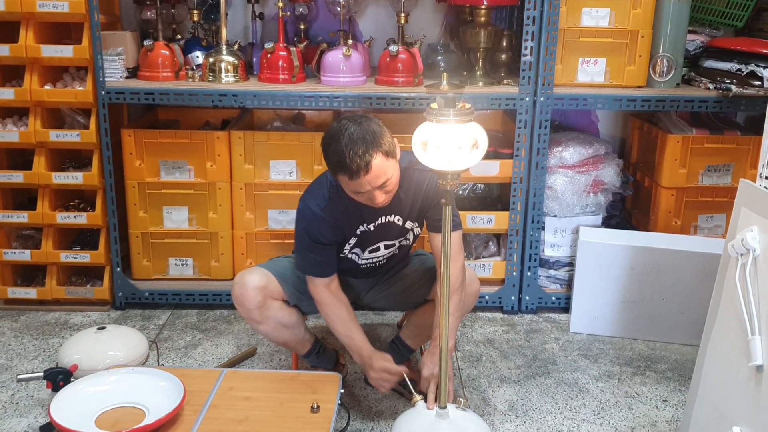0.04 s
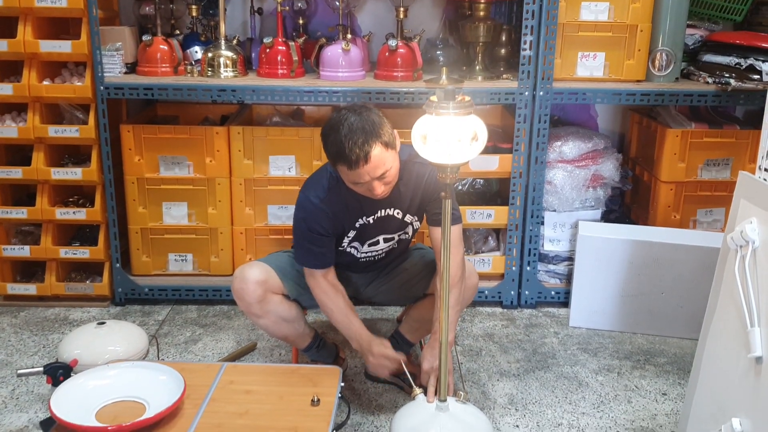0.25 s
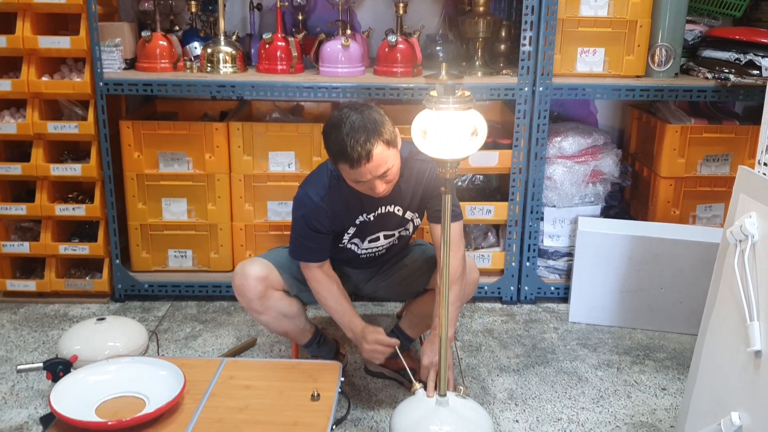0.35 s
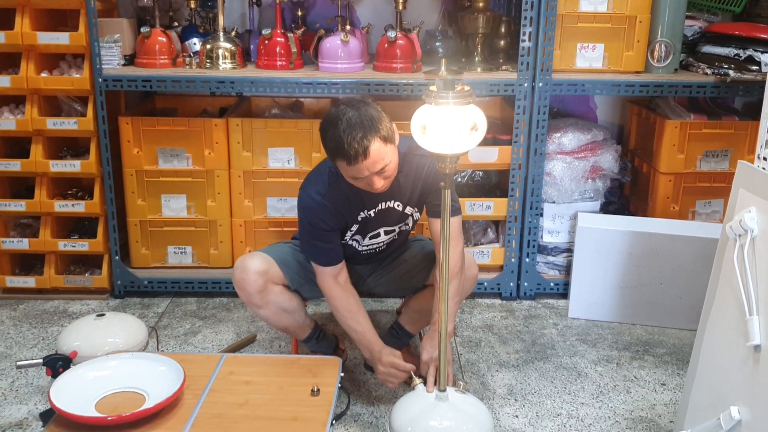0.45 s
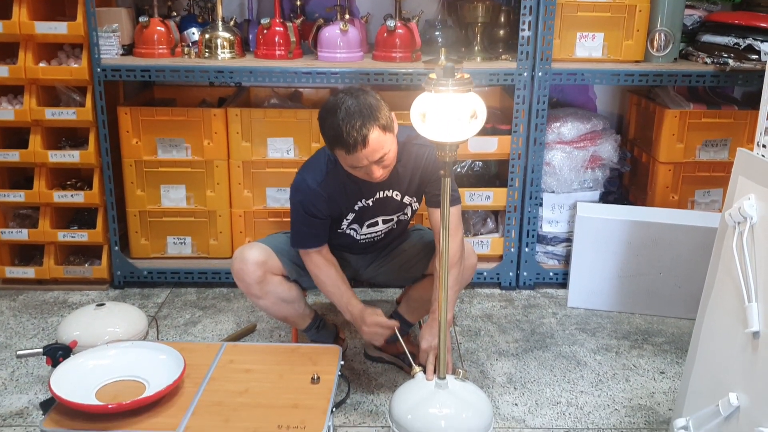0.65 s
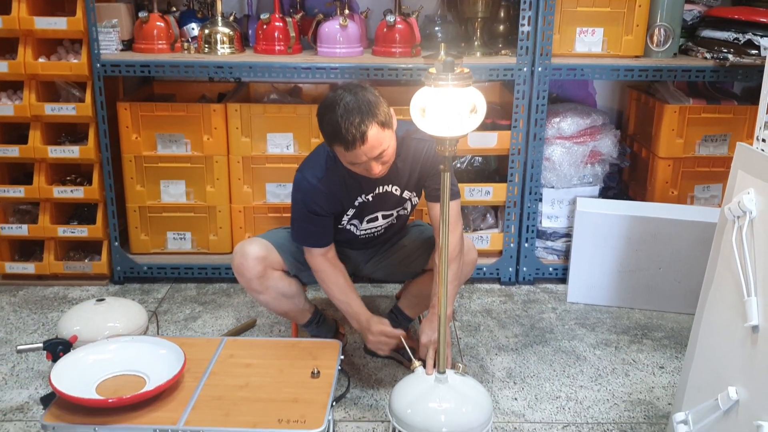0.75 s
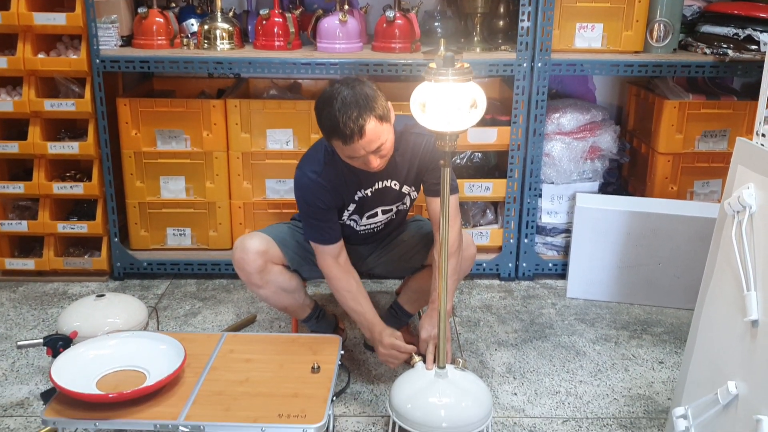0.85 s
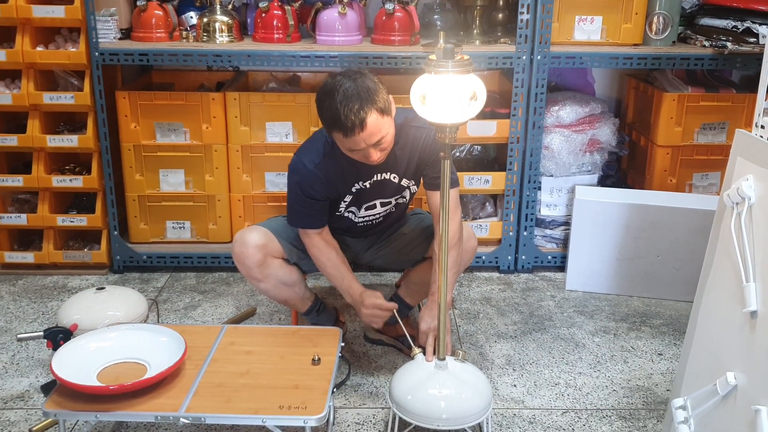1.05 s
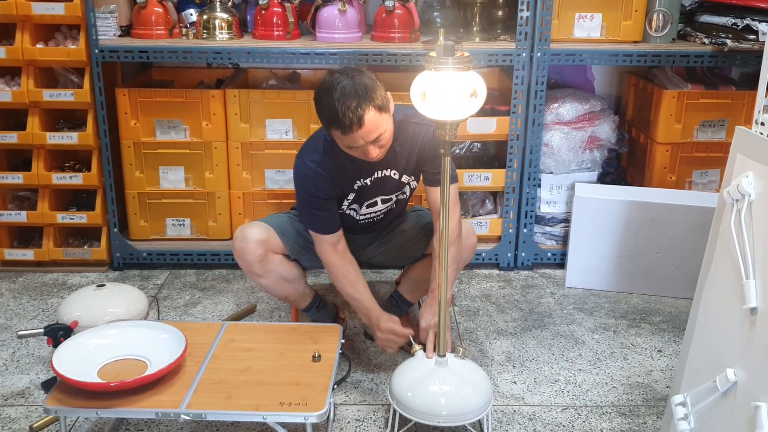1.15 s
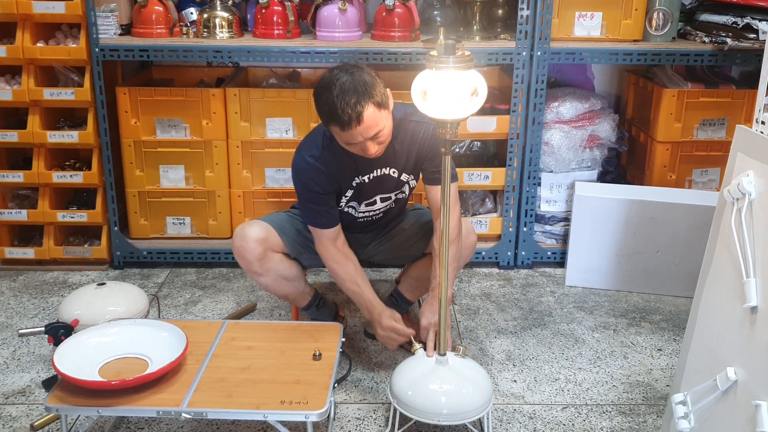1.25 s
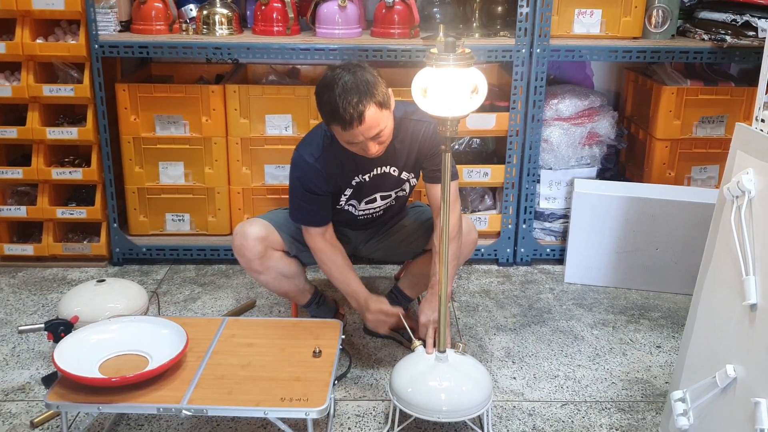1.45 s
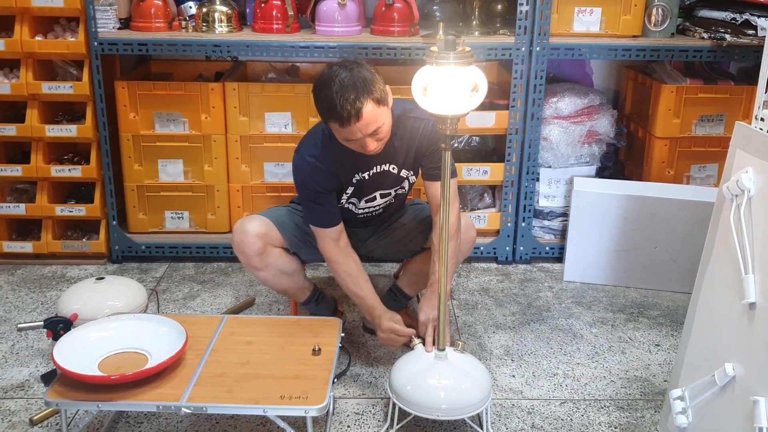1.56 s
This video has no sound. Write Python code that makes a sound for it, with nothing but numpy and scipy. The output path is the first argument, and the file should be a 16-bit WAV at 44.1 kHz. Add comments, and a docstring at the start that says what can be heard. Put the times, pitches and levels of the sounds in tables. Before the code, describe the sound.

Someone pumps up a lantern by hand in a workshop, almost three strokes a second. Hollow hoots and metallic puffs of air alternate with faint scraping pulls, while the flame hisses softly and the room rumbles low.

```python
"""Pumping up a lantern

A small hand pump on a lantern's metal tank is worked in a workshop, almost three strokes a second.
The rod swishes in and out. On each push the trapped air hoots down in pitch, then spits through
the valve and rings the metal. On each pull the seal scrapes faintly.
The flame's steady hiss and the room's low rumble lie under it all."""
import sys
import numpy as np
from scipy import signal
from scipy.fft import rfft, irfft, next_fast_len
from scipy.io import wavfile
from scipy.ndimage import uniform_filter1d, map_coordinates

SR = 44100
rng = np.random.default_rng(int(sys.argv[2]) if len(sys.argv) > 2 else 0)


def transcribe(signal):
    """Save signal, clipped to [-1, 1], as a 16-bit WAV file at the path in sys.argv[1]."""
    frames = np.atleast_2d(signal).T
    limited = np.clip(frames, -1, 1)
    pcm = np.round(limited * 32767).astype(np.int16)
    wavfile.write(sys.argv[1], SR, pcm)


N = 70560

# Pushes: (start [s], time to full pressure [s], hold [s], hoot level [dB], hoot swell [dB],
# valve delay [s], spit level [dB], spit brightness [dB per octave], first pitch drop time [s])
PUMP_PUSHES = [(0.173, 0.051, 0.002, -23.5, 23, 0.008, -29.5, -1.5, .025),
               (0.526, 0.046, 0.015, -27, 19, 0.002, -34, -1.74, .02),
               (0.889, 0.03, 0.012, -32.5, 5, 0.003, -47, -1.5, .014),
               (1.239, 0.055, 0.0017, -25.5, 17, 0.007, -29.5, -1.2, .022),
               (1.591, 0.044, .004, -23.5, 22, .004, -71.5, 0, .024)]
# Notes of the air chamber: (pitch [Hz], width [Hz], level [dB])
CHAMBER_NOTES = [(517, 21, -6), (568, 24, -6), (756, 21, -8)]
# Tone colour of spits, slips and ticks: (frequency [Hz], level [dB])
SPIT_COLOUR = [(150, -17), (400, 4), (750, 9), (1000, -2), (1400, 6), (2200, 6), (2900, 0.5), (4800, 5.5),
               (7000, -4.5), (10000, -0.5), (15500, -3.5)]


def hoots():
    """Trapped air sings lower and louder as the pressure builds, fluttering and ringing the chamber."""
    # Echoes off near walls: (delay [s], level [dB], lean to the left [dB])
    walls = [(.0195, -8, -8), (.0335, -14, 9)]
    start_hz, bend_hz, low_hz, end_hz = 775.5, 581.5, 500, 532
    flutter_hz, flutter_depth = 63.5, 0.64
    attack_s, fall_db_per_s = 0.0053, 400
    hoot = np.zeros(N)
    for start, rise, hold, db, swell_db, *_, glide in PUMP_PUSHES:
        t = np.maximum(clock() - start, 0)
        lowest_at = rise + hold / 2
        hz = np.interp(t, [0, glide, lowest_at, lowest_at + 0.03], [start_hz, bend_hz, low_hz, end_hz])
        rise_left = np.maximum(1 - t / rise, 0)
        level_db = db - swell_db * rise_left ** .8 - fall_db_per_s * np.maximum(t - rise - hold, 0)
        fade_in = np.minimum(t / attack_s, 1)
        flutter = 1 + flutter_depth * np.cos(2 * np.pi * flutter_hz * (t - rise))
        jitter = 0.02574 + .12 * np.exp(-t / .02)  # the pitch is shakiest at first
        note = tone(hz * (1 + jitter * wobble(500)))
        roughness = 1 + 0.24 * wobble(200)
        hoot += amp(level_db) * fade_in * flutter * note * roughness
    muffled = filtered(hoot, lambda f: 1 / (1 + 1j * f / 800))
    voice = amp(-5.5) * muffled + filtered(hoot, body(CHAMBER_NOTES))
    echoes = sum(amp(db) * pan(np.interp(clock() - delay, clock(), voice), lean)
                 for delay, db, lean in walls)
    return room(pan(voice, left_db=1.5) + echoes, wet_db=-13)


def valve():
    """At full pressure air spits through the valve, ringing the metal, the chamber and the tank."""
    # Notes of the hollow tank: (pitch [Hz], width [Hz], level [dB])
    tank_notes = [(166, 20, -4), (223, 14, -13), (256, 18, 19), (352, 14, -2)]
    # Notes of the metal: (pitch [Hz], time to fade 60 dB [s], level [dB])
    metal_notes = [(1355, .17, -6), (1414, .13, -11), (1645, .18, -5), (1981, .18, -9), (2060, .12, -10),
                   (2579, .18, -8), (2815, .2, -6), (3192, .15, -11), (3394, .13, -7), (3620, .14, -6),
                   (5250, .12, -7)]
    spit, thump = np.zeros((2, N)), np.zeros((2, N))
    for start, rise, hold, _, _, delay, db, bright_db, _ in PUMP_PUSHES:
        full_at = start + rise
        air = noise(lambda f: amp(along(SPIT_COLOUR, f) + bright_db * np.log2((f + 100) / 3000)),
                    alike=0.071)
        sputter = amp(1.8 * wobble(500))
        spit += amp(db) * air * sputter * burst(full_at + delay, hold, rise=0.018, fall_db_per_s=403)
        boom = noise(body(tank_notes), alike=.9)
        thump += amp(db - 13.5) * boom * burst(full_at, hold, rise=0.034, fall_db_per_s=354)
    # A note that rings longer makes a narrower peak.
    metal_peaks = [(hz, np.log(1000) / np.pi / fade, db) for hz, fade, db in metal_notes]
    ring = filtered(spit, body(metal_peaks))
    bright = pan(spit, left_db=5.5) + amp(11.5) * pan(ring, left_db=6)
    hollow = amp(17.5) * filtered(spit.mean(0), body(CHAMBER_NOTES)) + thump
    return room(bright, wet_db=-3.5) + room(hollow, wet_db=-8.5)


def thumps():
    """Full pressure can leave one or two hollow notes ringing in the tank and the chamber."""
    # Hollow notes: (time [s], pitch [Hz], time to fade 60 dB [s], level [dB])
    notes = [(.222, 218, .07, -36), (.585, 264, .27, -45), (.92, 160, .2, -56), (1.305, 266, .19, -45.5),
             (1.296, 741, .13, -35.5)]
    return room(ringing(notes, rise=0.0085, waver=0.0166), wet_db=-15.5)


def seal_slips():
    """The seal catches and slips on some pushes, ringing the pump barrel."""
    # Slips: (time [s], level [dB])
    slips = [(.179, -47), (0.917, -48.5), (0.921, -40), (0.931, -46), (0.944, -57), (1.242, -54),
             (1.257, -44)]
    # Notes of the barrel: (pitch [Hz], width [Hz], level [dB])
    barrel_notes = [(1397, 41, -1.5), (2046, 57, -2.5), (3405, 23, -0.5), (3660, 24, 2.5), (4880, 33, -18)]
    jerks = sum(amp(db) * burst(at, 0, rise=0.0016, fall_db_per_s=2198) for at, db in slips)
    rasp = jerks * noise(lambda f: amp(along(SPIT_COLOUR, f)), alike=0.21)
    ring = filtered(rasp, body(barrel_notes))
    return room(pan(amp(-4.5) * rasp + amp(15) * ring, left_db=7), wet_db=-4.5)


def piston_cracks():
    """On the hardest pushes the piston hits its stop with a short, bright crack."""
    # Hits: (time [s], level [dB])
    hits = [(0.2335, -38.5), (1.2955, -28.5), (1.302, -44.5)]
    # Tone colour of the crack: (frequency [Hz], level [dB])
    colour = [(1000, -54), (4000, 3), (7000, -4.5), (10500, 0.5), (15500, -5)]
    blows = sum(amp(db) * burst(at, 0, rise=0.0024, fall_db_per_s=1107) for at, db in hits)
    crack = blows * noise(lambda f: amp(along(colour, f)), alike=0.15)
    return room(pan(crack, left_db=12), wet_db=-10.5)


def pings():
    """A hard push leaves a metal note or two ringing."""
    # Lingering notes: (time [s], pitch [Hz], time to fade 60 dB [s], level [dB])
    notes = [(0.237, 1978, 0.28, -35), (1.306, 1664, 0.24, -38), (1.308, 2790, .2, -43)]
    return room(pan(ringing(notes, rise=0.003, waver=0.004), left_db=4.0), wet_db=-10.5)


def rod():
    """The rod swishes louder the faster it slides, falls silent at each turn, and ticks once."""
    # Slides inward: (start [s], length [s], level [dB])
    slides_in = [(-.09, 0.17, -48.5), (0.109, 0.16, -47.5), (0.46, 0.19, -46.5), (0.806, 0.16, -48.5),
                 (1.164, 0.18, -46), (1.53, 0.18, -48)]
    # Slides outward: (start [s], length [s], level [dB])
    slides_out = [(.3, 0.13, -48), (0.654, 0.13, -50), (1.005, 0.13, -48.5), (1.37, 0.12, -47)]
    # Tone colour of the swish: (frequency [Hz], level [dB])
    colour = [(1000, -68), (3000, -23), (5000, -1.5), (7200, -7), (8800, 3), (12000, 3.5), (15500, 7.5)]
    # Light tick: (time [s], level [dB])
    ticks = [(0.781, -51)]
    # The square root makes a push start and stop more sharply than a pull.
    pushes = sum(amp(db) * arch(start, length) ** .5 for start, length, db in slides_in)
    pulls = sum(amp(db) * arch(start, length) for start, length, db in slides_out)
    flicker = amp(1.2 * wobble(40))
    swish = flicker * patchy(noise(lambda f: amp(along(colour, f)), alike=.2), depth_db=2)
    knock = sum(amp(db) * burst(at, 0.00062, rise=0.0003, fall_db_per_s=1501) for at, db in ticks)
    tick = knock * noise(lambda f: amp(along(SPIT_COLOUR, f)) / (1 + (f / 4000) ** 2), alike=0.63)
    return room(pan((pushes + pulls) * swish + tick, left_db=7.0), wet_db=-18)


def seal_rubbing():
    """The seal scrapes on each pull, first high, then lower, and squeaks as one soft stroke lets go."""
    # Scrapes: (start [s], length [s], pitch [Hz], level [dB])
    scrapes = [(-0.007, 0.07, 4310, -63.5), (0.361, 0.051, 4460, -62.5), (0.397, .06, 2590, -61),
               (0.748, 0.071, 2580, -64), (1.084, 0.037, 4420, -57.5), (1.115, 0.033, 2680, -65),
               (1.436, 0.03, 4320, -58), (1.475, 0.014, 2640, -57.5)]
    # Squeaks: (start [s], length [s], first pitch [Hz], last pitch [Hz], level [dB])
    squeaks = [(.958, 0.034, 610, 550, -42), (0.987, 0.0294, 680, 930, -55),
               (1.016, 0.0183, 1450, 1620, -50), (1.028, 0.045, 1630, 1690, -57.5)]
    scrape, squeak = np.zeros((2, N)), np.zeros(N)
    for start, length, hz, db in scrapes:
        band = body([(hz, 0.15 * hz, 0)])
        scrape += amp(db) * arch(start, length) ** 0.14 * noise(lambda f: band(f) ** 2, alike=0.43)
    for start, length, from_hz, to_hz, db in squeaks:
        hz = np.interp(clock(), [start, start + length], [from_hz, to_hz])
        squeak += amp(db) * arch(start, length) * tone(hz * (1 + .035 * wobble(400)))
    return room(pan(scrape, left_db=10.0), wet_db=2.5) + room(pan(squeak, left_db=7.0), wet_db=-1)


def flame():
    """The burning lantern hisses steadily, with a few faint notes in the hiss."""
    # Tone colour of the hiss: (frequency [Hz], level [dB])
    colour = [(1000, -46), (1400, -35), (2300, -21), (3200, 6.5), (5000, -9), (6200, -5.5), (7200, -10.5),
              (8800, -9), (12000, -3.5), (15500, -3)]
    # Notes in the hiss: (pitch [Hz], width [Hz], level [dB])
    notes = [(1657, 49, 11.5), (2020, 138, 6.5), (2576, 7.7, 10), (4420, 89, 3)]
    hiss = amp(-60) * noise(lambda f: amp(along(colour, f)) * f ** 2 / (f ** 2 + 600 ** 2), alike=0.043)
    singing = amp(-59.5 + 0.24 * wobble(15.6)) * noise(body(notes), alike=0.18)
    return pan(hiss + singing, left_db=8.0)


def tank_drone():
    """The hollow tank hums one wavering note as it is handled."""
    # Loudness of the hum: (time [s], level [dB])
    levels = [(0, -52), (.06, -56), (.13, -68), (.36, -67), (.56, -64), (.69, -57), (.77, -58), (.83, -66),
              (.98, -56), (1.12, -62), (1.21, -70), (1.6, -72)]
    pitch_hz, waver_hz = 241, 14
    level_db = np.interp(clock(), *np.transpose(levels)) + 1.5 * wobble(14.0)
    return room(amp(level_db) * tone(pitch_hz + waver_hz * wobble(60.0)), wet_db=-6.5)


def room_rumble():
    """A low rumble swells and sinks under the soft, steady rush of the room's air."""
    # Loudness of the rumble: (time [s], level [dB])
    levels = [(0, -54), (.12, -60), (.25, -61.5), (.33, -70), (.5, -58), (.58, -57.5), (.72, -67),
              (.9, -62.5), (1.12, -58.5), (1.38, -55), (1.52, -73), (1.6, -51)]
    # Tone colour of the rumble: (frequency [Hz], level [dB])
    rumble_colour = [(20, -3), (35, 3), (50, 12.5), (72, 12), (95, 0.5), (140, -2), (300, -47)]
    # Tone colour of the air: (frequency [Hz], level [dB])
    air_colour = [(60, -66), (130, -14.5), (330, 0.5), (420, -8.5), (520, 1), (650, -14.5), (2000, -24.5)]
    swell = amp(np.interp(clock(), *np.transpose(levels)))
    rumble = swell * noise(lambda f: amp(along(rumble_colour, f)), alike=0.81)
    air = amp(-59.5) * noise(lambda f: amp(along(air_colour, f)), alike=0.72)
    return rumble + air


def room(x, wet_db):
    """Add the workshop's short, blurred echo at a level of wet_db."""
    # Length of the echo: (frequency [Hz], time to fade 60 dB [s])
    fade_times = [(150, 0.53), (600, 0.086), (2000, 0.21), (6000, 0.22), (15000, 0.21)]
    hz, t, bands = signal.stft(rng.standard_normal((2, SR // 2)), SR, nperseg=256)
    fade = amp(-60 * t / along(fade_times, hz)[:, None])
    tail = signal.istft(bands * fade, SR, nperseg=256)[1]
    tail = np.pad(tail / np.linalg.norm(tail[0]), ((0, 0), (200, 0)))  # arrives 200 samples late
    return x + amp(wet_db) * signal.fftconvolve(np.atleast_2d(x), tail, axes=1)[:, :N]


def amp(db):
    """Turn decibels into a multiplier."""
    return 10 ** (np.asarray(db) / 20)


def unit(x):
    """Scale to an average power of 1."""
    return x / np.sqrt(np.mean(x ** 2) + 1e-20)


def clock():
    """The time of every sample, in seconds."""
    return np.arange(N) / SR


def along(points, hz):
    """Read between (frequency, value) points, with octaves evenly spaced."""
    f, values = np.transpose(points)
    return np.interp(np.log(hz + 1), np.log(f + 1), values)


def wobble(rate):
    """A smooth curve through `rate` random values a second."""
    return map_coordinates(rng.standard_normal(int(N * rate / SR) + 4), [clock() * rate])


def filtered(x, response):
    """Multiply each frequency f in x by response(f)."""
    size = next_fast_len(N + SR // 2)
    return irfft(rfft(x, size) * response(np.fft.rfftfreq(size, 1 / SR)), size)[..., :N]


def body(peaks):
    """The response of an object that rings at (pitch [Hz], width [Hz], level [dB]) peaks."""
    return lambda f: sum(amp(db) * 1j * f * width / (hz * hz - f * f + 1j * f * width)
                         for hz, width, db in peaks)


def noise(response, alike):
    """Filtered stereo noise; alike=1 makes left and right the same, 0 unrelated."""
    middle, side = filtered(rng.standard_normal((2, N)), response)
    angle = np.arccos(np.clip(alike, -1, 1)) / 2
    middle, side = np.cos(angle) * middle, np.sin(angle) * side
    return unit(np.array([middle + side, middle - side]))


def patchy(x, depth_db):
    """Make a sound louder and softer in random patches of time and pitch."""
    bands = signal.stft(x, nperseg=512)[2]
    patches = uniform_filter1d(rng.standard_normal(bands.shape[1:]), size=5, axis=0)
    patches = uniform_filter1d(patches, size=8, axis=1)
    return unit(signal.istft(bands * amp(depth_db * unit(patches)), nperseg=512)[1][:, :N])


def pan(x, left_db):
    """Lean a sound to the left."""
    return x * amp(np.array([[left_db], [-left_db]]) / 2)


def arch(start, length):
    """One smooth swell and fade."""
    return np.abs(np.sin(np.pi * np.clip((clock() - start) / length, 0, 1)))


def tone(hz):
    """A pure tone that follows a moving pitch."""
    return np.sqrt(2) * np.sin(2 * np.pi * np.cumsum(hz) / SR)


def burst(peak, hold, rise, fall_db_per_s):
    """A quick swell, a hold and a steady fade; times are in seconds."""
    t = clock() - peak
    return np.exp(-(np.minimum(t, 0) / rise) ** 2) * amp(-fall_db_per_s * np.maximum(t - hold, 0))


def ringing(notes, rise, waver):
    """Notes that swell and die away, each wavering by a share of its pitch."""
    return sum(amp(db) * burst(at, 0, rise, 60 / fade) * tone(hz * (1 + waver * wobble(150)))
               for at, hz, fade, db in notes)


def scene():
    """The pump, the lantern and the room together."""
    pushes = hoots() + valve() + thumps() + seal_slips() + piston_cracks() + pings()
    return pushes + rod() + seal_rubbing() + flame() + room_rumble() + tank_drone()


def record(dry):
    """The microphone has a narrow dip in the treble, and the very highest sounds are cut off."""
    # Treble dip: (frequency [Hz], level [dB])
    dip = [(6000, -1.5), (6600, -1), (7150, -5), (7800, -2.5), (8500, -1)]
    top_hz = 15900
    return filtered(dry, lambda hz: amp(along(dip, hz)) * (hz < top_hz))


dry = scene()
out = record(dry)
transcribe(out)
```